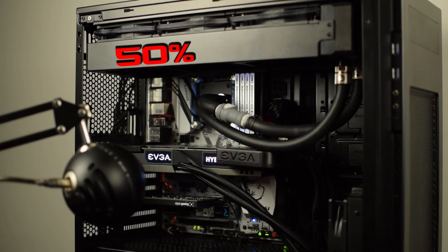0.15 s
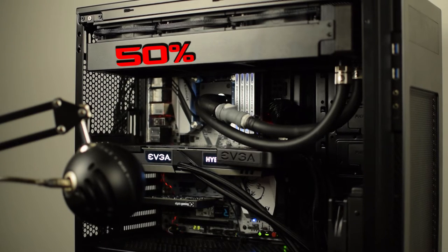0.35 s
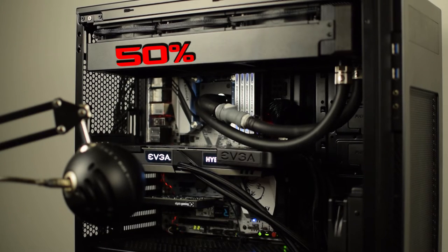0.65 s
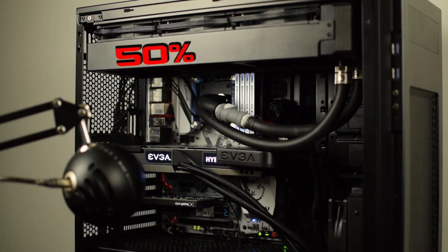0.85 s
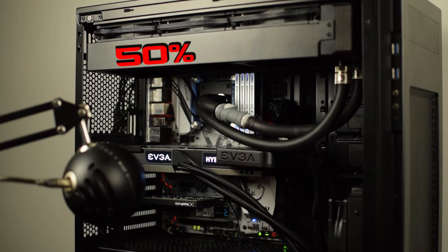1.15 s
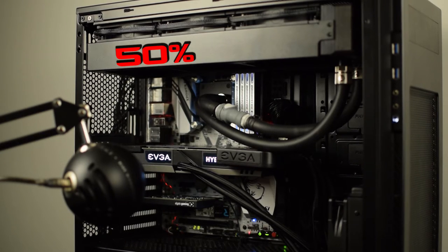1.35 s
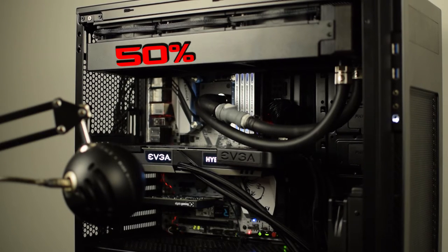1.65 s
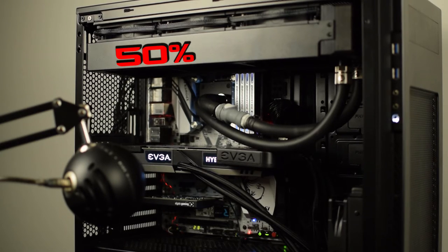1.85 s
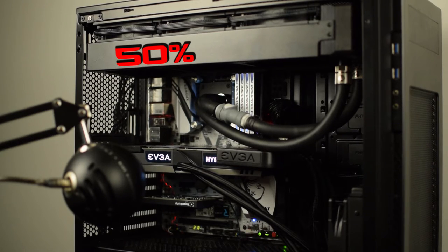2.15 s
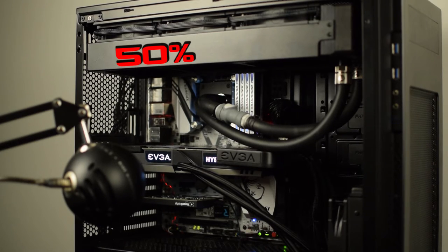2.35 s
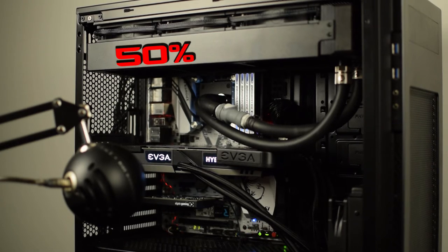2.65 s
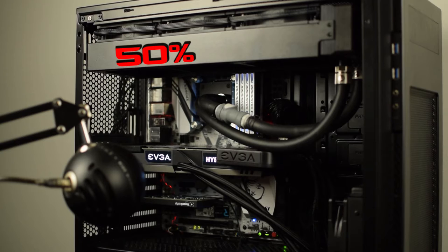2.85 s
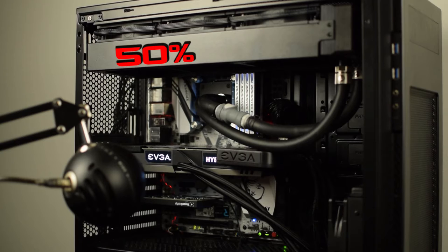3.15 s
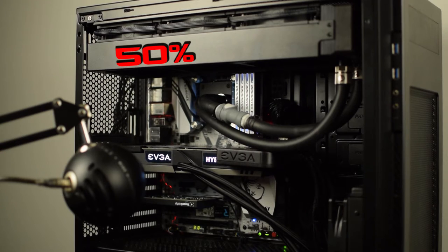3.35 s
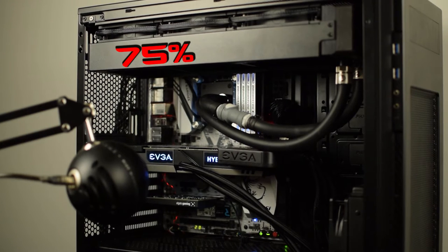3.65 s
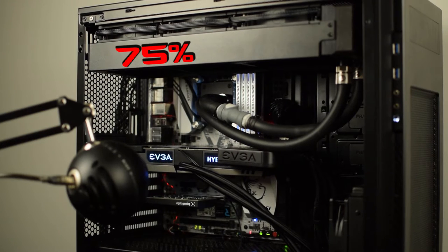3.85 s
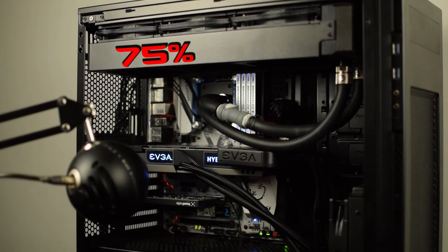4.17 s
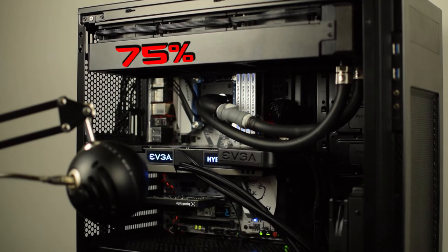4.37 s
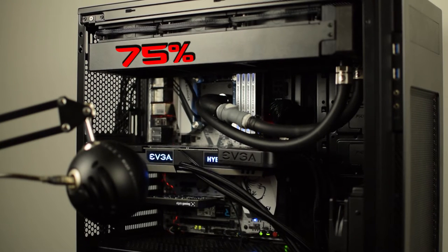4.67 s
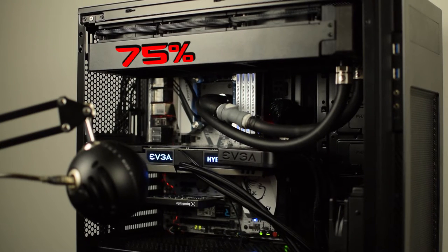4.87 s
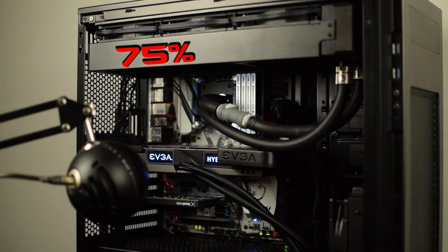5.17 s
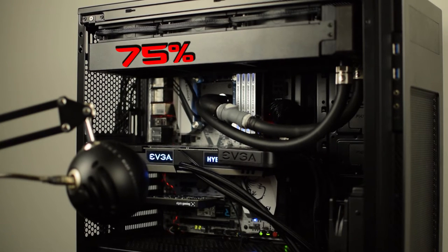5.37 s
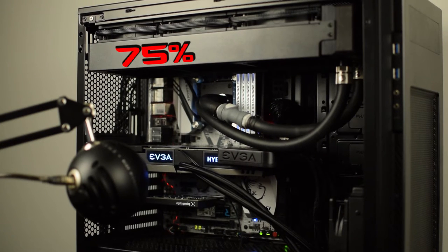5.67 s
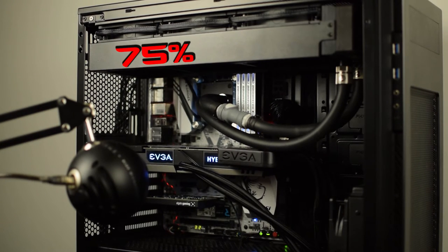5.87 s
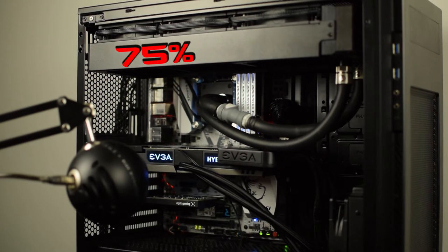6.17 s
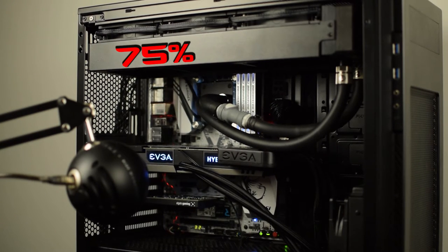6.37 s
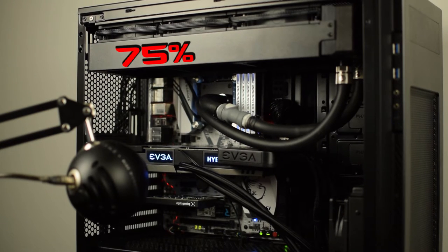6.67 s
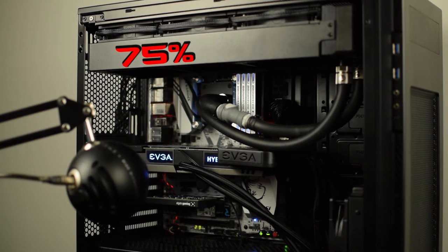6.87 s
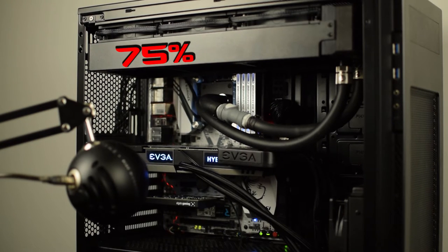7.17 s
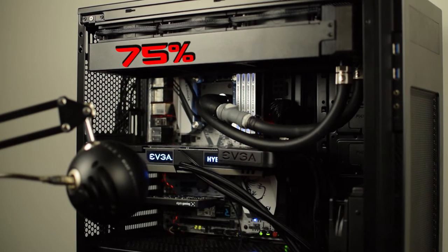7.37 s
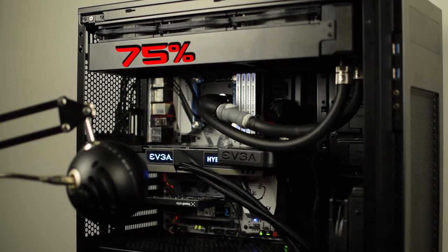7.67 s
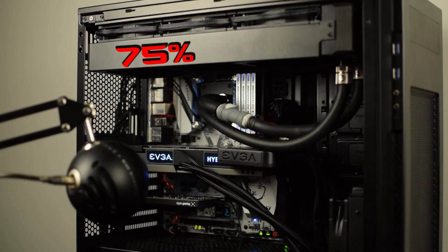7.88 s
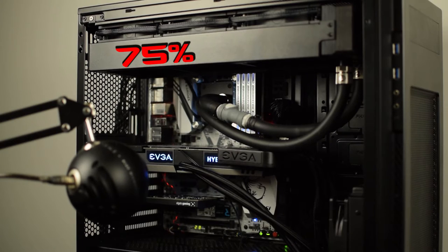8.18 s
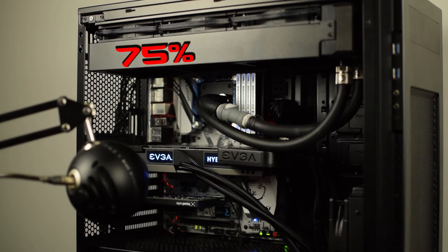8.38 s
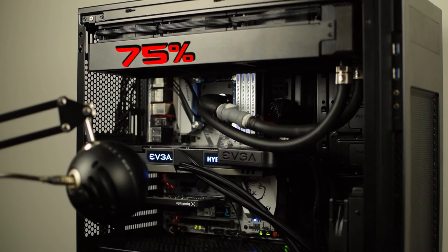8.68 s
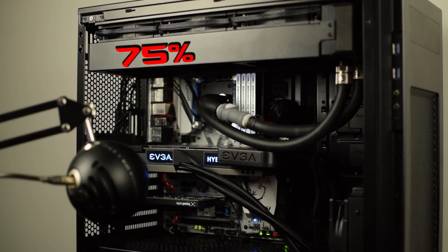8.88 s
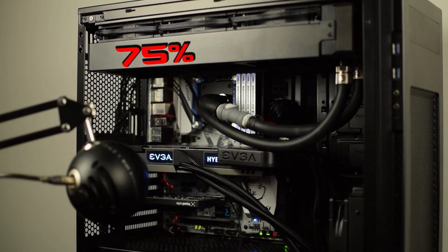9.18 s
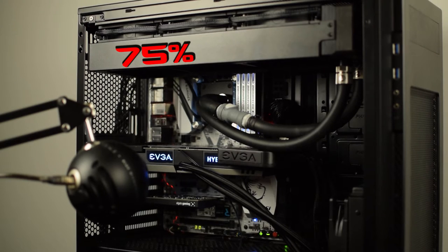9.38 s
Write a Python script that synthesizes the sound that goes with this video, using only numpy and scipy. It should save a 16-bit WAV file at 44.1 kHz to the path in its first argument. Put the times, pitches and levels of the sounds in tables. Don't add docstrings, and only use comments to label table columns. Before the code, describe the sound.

Close inside a computer case, a quiet fan whir and draught rumble switch suddenly to a stronger, higher-pitched hum and hiss that holds.

```python
import sys
import numpy as np
from scipy import signal
from scipy.fft import rfft, irfft, next_fast_len
from scipy.io import wavfile
from scipy.ndimage import uniform_filter1d, map_coordinates

SR = 44100
rng = np.random.default_rng(int(sys.argv[2]) if len(sys.argv) > 2 else 0)


def volts(x):
    e = np.asarray(x, float) / 20
    return 10 ** e


def to_wav(sig):
    pcm = np.clip(np.atleast_2d(sig), -1, 1) * 32767
    pcm = np.round(pcm).astype(np.int16)
    wavfile.write(sys.argv[1], SR, pcm.T)


N = 420273
T = np.arange(N) / SR


def read(table, at, log=False):
    x, y = np.transpose(table)
    if log:
        return np.interp(np.log(at), np.log(x), y)
    return np.interp(at, x, y)


def walk(rate):
    levels = rng.standard_normal(int(N / SR * rate) + 2)
    return 1.2 * np.interp(T * rate, np.arange(len(levels)), levels)


def bells(rows, width_s):
    coarse_t = T[::64]
    swells = sum(height * np.exp(-((coarse_t - s) / width_s) ** 2) for s, height in rows)
    return np.interp(T, coarse_t, swells)


def tone(turns, db, swell):
    angle = (2 * np.pi * ((turns + rng.random()) % 1)).astype(np.float32)
    return 2 ** .5 * volts(db) * (1 + swell * walk(4)) * np.sin(angle)


def hum(setting):
    # pitch in Hz, level in dB rms at half power, level in dB rms at three-quarter power.
    hum_tones = [(135.9, -59, -58), (388.6, -73, -77), (408, -64.2, -66.6), (424, -72, -73),
                 (485.2, -75, -77.5), (535.6, -95, -79), (736, -77, -80.5), (2846, -95, -110),
                 (3001, -99, -92), (3121, -110, -89.5), (3134.5, -93, -110), (4146.5, -89, -97),
                 (4232, -91, -110), (4686, -110, -92)]
    drift = np.cumsum(1 + 0.000504 * walk(2.2)) / SR
    out = 0
    for row in hum_tones:
        hz, db = row[0], row[1 + setting]
        if db > -100:
            out = out + tone(drift * hz, db + .4, swell=.11)
    return out


def slow_fan(size=4096):
    turns_hz, centre_hz, width_hz, level_db = 21.4, 4500, 1500, -80
    order_hz = np.arange(size // 2 + 1) * turns_hz
    band = 1 / (1 + (2 * (order_hz - centre_hz) / width_hz) ** 6)
    one_turn = irfft(rfft(rng.standard_normal(size)) * band, size)
    one_turn = one_turn / one_turn.std()
    angle = np.cumsum(turns_hz * (1 + .0006 * walk(6))) / SR
    return map_coordinates(one_turn, [angle % 1 * size], order=1, mode="grid-wrap") * volts(level_db)


def knock_timing(setting, near, order_hz):
    # angle of the first knock in turns, angle of the second in turns,
    # size of the second as a share of the first, pitch of the ring in Hz, width of the ring in Hz.
    knock_pairs = [
        (.3124, .8904, .7, 10200, 60),
        (.4588, .842, .99, 10200, 120),
    ]
    first, second, share, ring_hz, width_hz = knock_pairs[setting]
    knocks = np.exp(-2j * np.pi * near * first) + share * np.exp(-2j * np.pi * near * second)
    knocks = knocks / (1 + 2j * (order_hz[near] - ring_hz) / width_hz)
    return knocks / abs(knocks)


def turn_of_rattle(setting, shaft_hz, size):
    # order, level in dB rms.
    loud_orders = [
        [(177, -93.7), (178, -88.7), (226, -92.1), (250, -89.5), (252, -90.7), (264, -91.7), (271, -90.9), (274, -88.2), (275, -90.3), (293, -91.6), (346, -90.7), (359, -89.1), (360, -91.6), (362, -91.4)],
        [ (129, -85.6), (130, -88.8), (131, -88.6), (144, -86.4), (168, -87.8), (178, -90.7), (184, -89.8), (196, -89.6), (200, -85.8), (205, -87.9), (212, -88.1), (128, -90.9), (252, -91.5), (265, -86.4)],
    ]
    # order, level in dB rms.
    ring_orders = [
        [(303, -107.5), (304, -101.8), (305, -96.5), (306, -100.2), (307, -91.2), (308, -100.4), (309, -85.4), (310, -92.8), (311, -87.7), (312, -91.8), (313, -94.1), (314, -95.5), (315, -96.0), (316, -106.7), (317, -102.3), (318, -99.7), (319, -116.7)],
        [(225, -88.5), (226, -87.9), (227, -83.5), (228, -86.6), (229, -84.1), (230, -83.1), (231, -99.5), (232, -90.2), (233, -95.4), (234, -98.9), (235, -99.6), (236, -93.3)],
    ]
    # pitch in Hz, level in dB rms.
    other_orders = [
        [(2500, -110.4), (3500, -108.5), (4300, -103.5), (5000, -101.9), (5800, -102.1), (6800, -103.3), (8000, -101.7), (9000, -99.9), (9800, -101.9), (11000, -103.4), (11900, -99.8), (13000, -101.2), (14000, -101.8), (15500, -110.3)],
        [(2500, -107.2), (3500, -105.1), (4300, -101.6), (5000, -98.9), (5800, -102.5), (6800, -103.5), (8000, -97.3), (9000, -99.0), (9800, -98.3), (11000, -99.0), (11900, -97.7), (13000, -100.4), (14000, -100.7), (15500, -105.7)],
    ]
    order_hz = np.maximum(np.arange(size // 2 + 1), 1) * shaft_hz
    flaws = rng.standard_normal((2, len(order_hz)))
    mean_level = volts(read(other_orders[setting], order_hz, log=True) - .3)
    strength = mean_level * np.hypot(*flaws) / 2 ** .5
    flaw_spread_db = 1.5
    strength = strength * volts(flaw_spread_db * rng.exponential(size=len(order_hz)) - .2)
    strength = strength * (order_hz > 2400) * (order_hz < 15700)
    orders, loud_db = np.transpose(loud_orders[setting] + ring_orders[setting])
    strength[orders.astype(int)] = volts(loud_db + 1.2)
    strength = strength * volts(2.5 * np.clip(order_hz / 300 - 39, 0, 1))
    timing = np.exp(2j * np.pi * rng.random(len(order_hz)))
    near = np.transpose(ring_orders[setting])[0].astype(int)
    timing[near] = knock_timing(setting, near, order_hz)
    return irfft(strength * timing, size) * size / 2 ** .5


def motor(setting, size=16384):
    # time in seconds, extra speed as a share.
    speed_surges = [
        (1.45, 4e-4),
        (6.0, 4.5e-4),
        (8.8, 4.5e-4),
    ]
    # time in seconds, change in dB.
    rattle_skips = [
        (3.02, -3),
        (4.305, -6),
        (9.418, -7),
    ]
    shaft_hz = (33.093, 44.6305)[setting]
    speed = shaft_hz * (1 + 1.2e-4 * walk(5) + bells(speed_surges, width_s=.15))
    one_turn = turn_of_rattle(setting, speed.mean(), size)
    angle = np.cumsum(speed * (1 + 6e-5 * walk(14))) / SR
    rattle = map_coordinates(one_turn, [angle % 1 * size], order=1, mode="grid-wrap")
    level_db = .35 * walk(5.4) + .45 * walk(40) + bells(rattle_skips, width_s=.02)
    return rattle * volts(level_db)


def fans(setting):
    # turns a second in Hz, then a list of tones, each an order and a level in dB rms.
    half_power_fans = [
        (22.97, [(7, -59.4), (8, -68), (24, -84), (28, -86), (36, -86.6), (38, -89), (40, -86.7), (41, -90), (44, -88.3)]),
        (22.235, [(7, -64), (25, -82.4), (44, -89), (45, -86.8), (48, -78.7), (49, -86), (50, -89), (54, -89)]),
    ]
    high_power_fans = [
        (31.02, [(7, -54.9), (28, -72.5), (31, -81.4), (32, -70)]),
        (30.39, [(1, -53), (7, -57.5), (32, -74), (33, -79.5), (34, -79.3), (35, -79), (36, -77), (40, -78.1)]),
    ]
    out = 0
    for hz, orders in (half_power_fans, high_power_fans)[setting]:
        turns = np.cumsum(hz * (1 + 0.0011 * walk(2.5))) / SR
        out = out + sum(tone(order * turns, db - .1, swell=0.14) for order, db in orders)
    return out


def air_colour(setting, hz):
    # pitch in Hz, level in dB per Hz.
    buffet_levels = [
        [(10, -67), (16, -68), (35, -62.5), (70, -64.5), (120, -65.5), (150, -72.5), (190, -76), (250, -77), (300, -82), (370, -82.5), (460, -91), (620, -97.5), (940, -96)],
        [(10, -54.5), (16, -62), (35, -57.5), (70, -56), (120, -59.5), (150, -63.5), (190, -70.5), (250, -72.5), (300, -71), (370, -79), (460, -86.5), (620, -89.5), (940, -91.5)],
    ]
    # pitch in Hz, level in dB per Hz.
    fin_levels = [
        [(1100, -95), (1300, -96.5), (1480, -104.2), (2100, -105.2), (2600, -109.9), (3500, -108.6), (3760, -111.3), (4500, -105.6), (5300, -107.7), (5650, -111.8), (7800, -112.7), (8800, -113.3), (15600, -119.7)],
        [(1100, -90), (1300, -91), (1480, -96.5), (2100, -96.5), (2600, -103.3), (3500, -104.7), (3760, -109.3), (4500, -103.8), (5300, -104.9), (5650, -109.1), (7800, -109.3), (8800, -112.6), (15600, -117.9)],
    ]
    # pitch in Hz, width in Hz, level in dB over the hiss.
    case_rings = [(3230, 460, 2.5), (3940, 130, 4.5), (4170, 205, 5.5), (6300, 420, 3), (10300, 260, 6),
                  (12050, 690, 7), (3850, 95, 1.5), (4050, 60, -12), (337, 36, -1.5), (1050, 70, -1),
                  (2070, 460, 0.96), (14400, 300, 2), (13900, 400, 4), (1240, 164, 2), (920, 40, -1),
                  (257, 22, -2), (11900, 170, -7), (15000, 1400, 2)]
    grid_hz = np.arange(0, SR / 2, 4)
    rings = 0
    for f, width, db in case_rings:
        rings = rings + (volts(2 * db) - 1) / (1 + (2 * (grid_hz - f) / width) ** 4)
    rings = np.interp(hz, grid_hz, rings)
    flow = volts(read(buffet_levels[setting] + fin_levels[setting], hz, log=True))
    return flow * np.sqrt(1 + rings) * np.minimum(hz / 8, 1)


def air(setting):
    # time in seconds, level in dB over the mean.
    gust_times = [(.42, 2), (.9, 0.5), (1.3, 1.5), (2.1, 2.5), (3.05, 3), (3.62, 2.5), (4.14, 2),
                  (4.54, 2.5), (5.34, 2.5), (6.03, 4), (6.54, 0.5), (7.14, 1), (7.56, 1), (8.14, 0.5),
                  (8.6, 2.5), (9.34, 0.5)]
    buffet_db = (-43, -38)[setting]
    pump_hz = 122.5
    size = next_fast_len(N)
    hz = np.maximum(np.arange(size // 2 + 1) * SR / size, 1)
    noise = rfft(rng.standard_normal(size)) * air_colour(setting, hz) * np.sqrt(SR / 2)
    low_share = 1 / (1 + (hz / 150) ** 4)
    pump_share = 1 / (1 + ((hz - 4300) / 1100) ** 4)
    low = irfft(noise * low_share, size)[:N]
    chopped = irfft(noise * pump_share, size)[:N]
    rest = irfft(noise * (1 - low_share - pump_share), size)[:N]
    low = low / np.sqrt(uniform_filter1d(low ** 2, SR // 5) + 1e-12)
    low = low * volts(buffet_db + bells(gust_times, width_s=0.11) + 0.82 * walk(4.2))
    chopped = chopped * (1 + 0.13 * np.sin(2 * np.pi * pump_hz * T))
    return low + (chopped + rest) * volts(0.14 * walk(8))


def scene():
    cut_s, cut_jump, cut_fade_s = 3.43655, .018, .004
    lead_in_s, lead_in_share = .075, .45
    half, high = (air(k) + fans(k) + hum(k) + motor(k) for k in (0, 1))
    cut = int(cut_s * SR)
    lead_in = lead_in_share * np.clip(1 + (T - cut_s) / lead_in_s, 0, 1)
    half = half + slow_fan() + lead_in * high
    after = T[cut:] - T[cut]
    jump = half[cut - 1] + cut_jump - high[cut]
    high = high[cut:] + jump * np.exp(-after / cut_fade_s)
    return np.concatenate([half[:cut], high])[None]


def band_limit(x):
    return signal.sosfilt(signal.butter(12, 15710, fs=SR, output="sos"), x)


def record(dry):
    return band_limit(dry)


dry = scene()
out = record(dry)
to_wav(out)
```